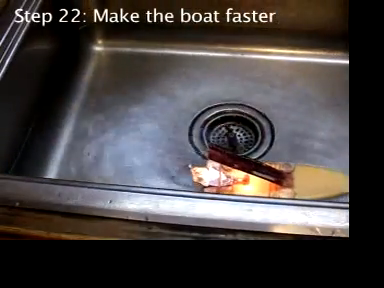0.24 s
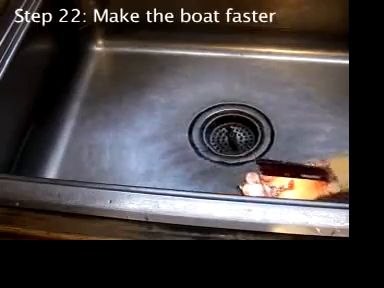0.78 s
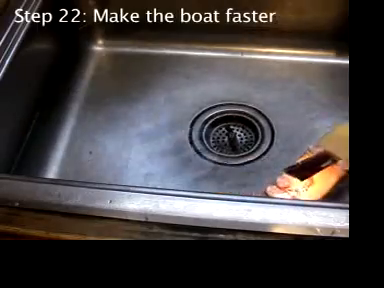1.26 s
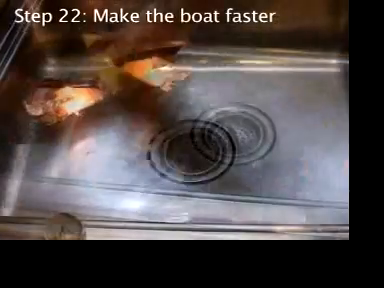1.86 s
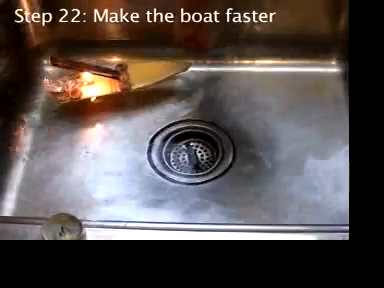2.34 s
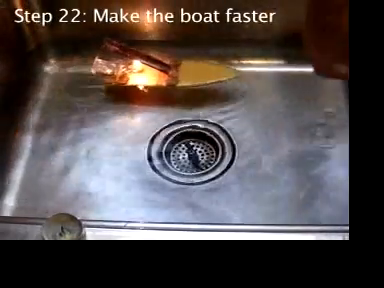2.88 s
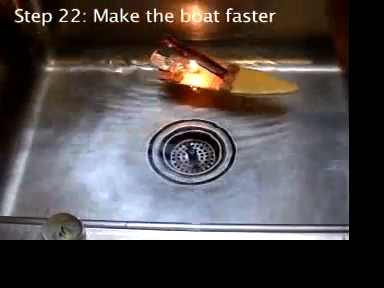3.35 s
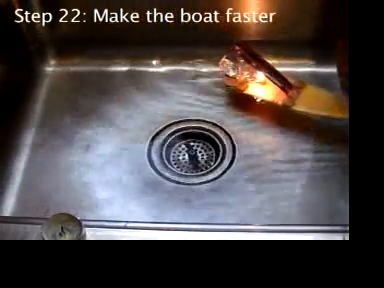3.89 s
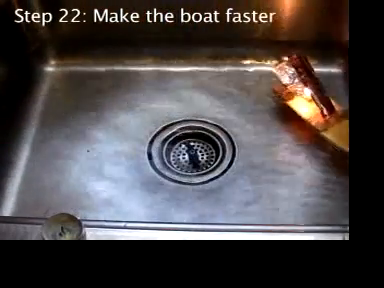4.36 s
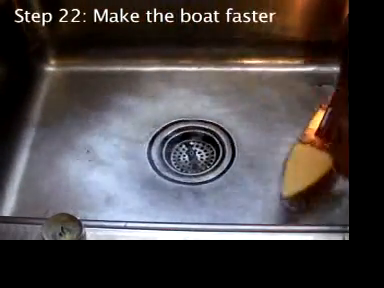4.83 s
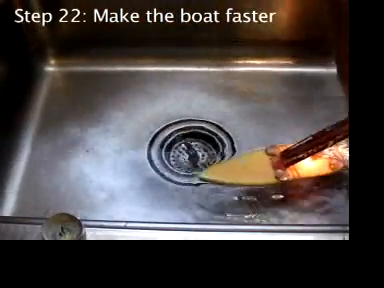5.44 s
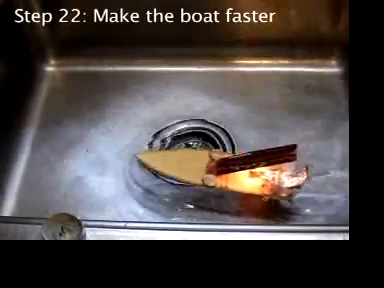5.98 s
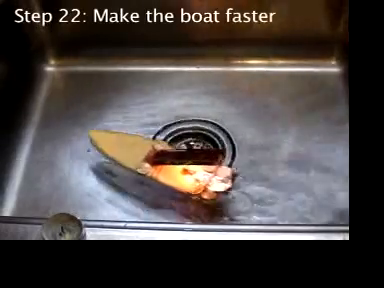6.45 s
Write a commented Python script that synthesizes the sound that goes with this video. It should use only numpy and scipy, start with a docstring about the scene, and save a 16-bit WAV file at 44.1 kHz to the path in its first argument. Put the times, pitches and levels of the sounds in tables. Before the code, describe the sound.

A small toy steam boat putt-putts fast in a steel sink, faltering twice at first, then popping along in steady metallic clicks.

```python
"""Close by a steel sink, a candle-heated toy boat sputters and stalls twice early on, leaving the room's hush.
Then it runs on. Most steam cycles buckle the thin boiler lid out and back in a tick, a loud pop, a return and a
settle; near 1.8 s the rhythm stumbles and two cycles pass without a pop, and one more near 4.0 s. Each snap
rings the lid's modes, cracks as dying noise, knocks the hull and is answered by the basin's decaying noise.
Room and microphone noise and faint steady tones lie beneath."""
import sys
import numpy as np
from scipy import signal
from scipy.fft import rfft, irfft, next_fast_len
from scipy.io import wavfile

SR = 44100
rng = np.random.default_rng(int(sys.argv[2]) if len(sys.argv) > 2 else 0)


def digitize_waveform(pressure):
    """Quantize a signal to 16-bit integers and store it at the path in sys.argv[1].

    Rows of a 2-D input are taken as channels; values are limited to [-1, 1].
    """
    field = np.atleast_2d(pressure).T
    bounded = np.clip(field, -1, 1)
    quanta = np.round(bounded * 32767).astype(np.int16)
    wavfile.write(sys.argv[1], SR, quanta)


N = 295911
LENGTH = 6400  # samples given to one snap and its echo

# steam cycles: (pop time [s], pop level before trims [dB], tick to pop [ms], pop to return [ms],
# return to settle [ms])
CYCLES = [(.0912, -4, 45.8, 34.3, 22.8), (.398, -4.5, 29.8, 40.8, 21), (.5063, -5.5, 25.7, 42.9, 20.8),
          (.622, -6, 29.8, 38.3, 21), (.7344, -7, 28.9, 39.7, 21), (1.059, -5.5, 32.3, 36, 22.4),
          (1.166, -4.5, 25.3, 42.2, 15.2), (1.274, -4, 21.4, 43, 8.2), (1.3777, -3, 17.9, 45.5, 14.3),
          (1.4825, -3.5, 15.4, 47.5, 13), (1.5917, -5, 15.9, 47.7, 10), (1.6934, -6.5, 13.5, 47.8, 11.5),
          (1.79, -35, 7.6, 22.8, 9.7), (1.883, -35, 20.3, 27.6, 27.2), (2.0033, -.5, 20.9, 30.8, 21.1),
          (2.1203, -1.5, 19.9, 33.8, 18), (2.2358, -2, 14.9, 36.6, 17.6), (2.3531, -2, 15.8, 36.9, 14.8),
          (2.4673, -1.5, 13.6, 38.9, 15.6), (2.583, -3.5, 11.8, 39.3, 14.4),
          (2.6973, -3.5, 11.5, 39.9, 15.4), (2.8143, -5, 13.3, 37.7, 17.9), (2.9343, -2, 16.8, 36.7, 18.3),
          (3.054, -2, 17.3, 37.1, 15.4), (3.1715, -1.5, 16.7, 37.1, 15.1), (3.2905, .5, 18.2, 35.8, 17.1),
          (3.4131, .5, 21.8, 32.2, 14.7), (3.5322, -1, 23.4, 30.4, 18.1), (3.6479, -1, 20.4, 35.1, 19),
          (3.7669, .5, 19.1, 36.5, 15.6), (3.8843, -.5, 18.9, 36.7, 17.9), (4.003, -35, 19.5, 31, 21.2),
          (4.132, .5, 31, 25.5, 17.9), (4.2539, -3, 33.1, 19.8, 21.9), (4.367, -1, 25.7, 32, 18.7),
          (4.4848, -2.5, 21.8, 35.3, 19.9), (4.6055, -2.5, 21.5, 37.3, 16.5),
          (4.7282, -5.5, 21.2, 36.7, 16.1), (4.8467, -5, 16.5, 37.9, 16.2), (4.9657, -3, 17.5, 36.3, 15.3),
          (5.0849, -3, 17.5, 35.2, 15.5), (5.2028, -2, 17.4, 37.2, 14), (5.3193, -2, 14.3, 38.1, 13.6),
          (5.435, -6, 12.8, 37.6, 14.6), (5.5498, -3.5, 13.1, 38.7, 14.5), (5.6677, -5, 13.7, 38, 14.6),
          (5.7842, -3.5, 13.4, 39.3, 13.9), (5.905, -4, 17, 37.7, 14.3), (6.0239, -1.5, 15.7, 38.2, 17.3),
          (6.1427, -3, 16.4, 38.5, 16.8), (6.2656, -1.5, 19.5, 36.9, 14.1), (6.3876, -1, 20.6, 33.8, 15.8),
          (6.507, -1.5, 23.5, 31.8, 14.3), (6.626, -3, 24.4, 30.7, 16)]
# lone snaps, and one short bright hiss at 0.361 s, while the engine falters:
# (time [s], high ring level before trims [dB], high ring [Hz], low ring [Hz], then before trims and
# relative to the high ring: low ring [dB], crack [dB], knock [dB]; knock [Hz])
SPUTTERS = [(.0004, -18.5, 1940, 1320, -1, -11, -16, 775), (0.012, -14, 3670, 1580, -1, -1, -1.5, 670),
            (.251, -21.5, 2380, 1310, 8.5, -19, -8, 579), (0.2689, -18, 2120, 960, 3, -11, -8, 805),
            (0.3485, -22, 2380, 1340, 8, -15, -3, 576), (0.361, -30, 3280, 1700, 3, 12.5, -2, 600),
            (0.9626, -47, 2240, 1500, 17, -6, 30.5, 635), (0.9685, -56, 2260, 1500, 9, -4, 25, 643),
            (1.004, -21.5, 2540, 1520, 6.5, -13, -1.5, 574)]
SNAP_COUNT = 4 * len(CYCLES) + len(SPUTTERS)


def engine():
    """Snaps and basin echoes placed in time; the treble reaches the two microphone ports by different paths."""
    delay_s, bass_hz = .0006, 160
    rows = rattled(snaps())
    wet = irfft(rfft(rows) * rfft(basin()), LENGTH)
    # the small basin scatters low tones less
    wet = coloured(wet, lambda hz: 0.48 + 0.22 / (1 + (900 / (hz + 1)) ** 4))

    paths = rng.standard_normal(rows.shape) * dying(0.0034, .0001)
    paths = rfft(paths / np.linalg.norm(paths, axis=-1, keepdims=True))
    apart = coloured(rows, lambda hz: paths * amp(-2.5) * (hz / 12000) ** 0.91)
    heard = rows + np.array([apart, -apart]) + amp(-3.5) * wet

    out = np.zeros((2, N + LENGTH))
    for k, row in enumerate(snap_rows()):
        start = round((row[0] + delay_s) * SR)
        out[:, start:start + LENGTH] += heard[:, k]
    wide = np.pad(out, ((0, 0), (0, next_fast_len(N + 2 * LENGTH) - N - LENGTH)))
    # a small boat radiates little bass
    return coloured(wide, lambda hz: (1j * hz / (bass_hz + 1j * hz)) ** 3)[:, :N]


def snaps():
    """The direct sound of every snap, one row each: lid rings, dense lid noise and a knock on the hull."""
    s, db, high_hz, low_hz, low_db, crack_db, knock_db, knock_hz = snap_rows().T
    # chance from snap to snap; the treble crack varies most
    level_scatter_db, crack_scatter_db, pitch_scatter = 1.2, 2.5, .02
    chance = rng.standard_normal((SNAP_COUNT, 6)).T
    db = db + level_scatter_db * chance[0]
    low_db = low_db + level_scatter_db * chance[1]
    crack_db = crack_db + crack_scatter_db * chance[2]
    knock_db = knock_db + level_scatter_db * chance[3]
    high_hz = high_hz * np.exp(pitch_scatter * chance[4])
    low_hz = low_hz * np.exp(pitch_scatter * chance[5])

    noise = lid_noise(db, low_db, crack_db)
    rings = lid_rings(s, db, high_hz, low_hz, low_db)
    push = amp(db + knock_db + 5.5)[:, None] * knock(knock_hz)
    return rings + noise + push


def snap_rows():
    """Tick, pop, return and settle of every cycle in turn, then the sputters; columns as for SPUTTERS."""
    # colour of each snap over time, changing abruptly near 1.8 s, all three with the columns of SPUTTERS:
    # (time [s], high ring level [dB], high ring [Hz], low ring [Hz], low ring [dB], crack [dB],
    # knock [dB], knock [Hz])
    tick_colours = [(.05, -19.5, 2190, 1260, 6, -10, -5, 790), (.4, -20, 2040, 910, 8.5, -8, -16, 800),
                    (1.1, -21.5, 2010, 960, 7.5, -8, -28, 800), (1.76, -15.5, 1990, 960, -6, -19, -29, 650),
                    (1.86, -8.5, 2650, 1130, -3.5, -3.5, -8.5, 540),
                    (2.6, -4, 2750, 990, -23, -11, -14, 530), (3.2, -10, 3000, 1090, 0.5, -1.5, -12, 536),
                    (3.75, -6, 2770, 970, -15, -14.5, -19.5, 535),
                    (4.1, -11.5, 2980, 1430, -3.5, -13, -12, 517),
                    (4.5, -10.5, 2950, 1200, -5, -3.5, -14, 866), (5.1, -9.5, 2880, 1090, 1, -3, -15, 874),
                    (5.6, -13, 2700, 950, -2.5, -1, -7, 597), (6.0, -10, 2880, 1010, -3, -3.5, -14, 650),
                    (6.7, -13, 2750, 1040, 1, -4.5, -14, 633)]
    return_colours = [(.13, -14, 3430, 1210, 10.5, 3.5, 0, 680), (.5, -15, 3100, 1170, 2, 0, -0.5, 670),
                      (1.1, -11.5, 3030, 1000, -2.5, -5, -7.5, 585),
                      (1.3, -14, 2820, 1600, -3, -2.5, -2, 664), (1.75, -14.5, 3300, 1540, 2, 2.5, -2, 530),
                      (1.85, -19, 2200, 1160, 12, -21, -3, 545),
                      (2.2, -10, 2470, 1260, -4.5, -1, -12.5, 550),
                      (2.6, -9.5, 2270, 1250, -4, -16.5, -6.5, 566),
                      (3.0, -13, 2510, 1240, 6, -0.5, -5, 720), (3.45, -17.5, 2630, 1105, 9.5, -3, -8, 576),
                      (3.9, -18, 2670, 1320, 3.5, -4, -6.5, 794), (4.55, -13.5, 2420, 1290, 6, -8, -9, 835),
                      (4.8, -9.5, 3400, 1210, 6, -5, -16, 485), (5.0, -10, 2500, 1160, 1.5, -7, -14.5, 645),
                      (5.4, -13, 2500, 1280, 6.5, -2, -11, 634),
                      (6.0, -11.5, 2700, 1250, 6.5, -6.5, -11.5, 650),
                      (6.7, -19, 2350, 1250, 12.5, -1, -8, 790)]
    settle_colours = [(.15, -20, 2970, 1320, -9, -4, -20, 800), (1.1, -32.5, 3130, 1540, 21, -8, -6, 650),
                      (1.3, -24, 1900, 1600, 10, 2.5, 4.5, 645),
                      (1.76, -19.5, 2330, 1440, 13.5, 1.5, 0.5, 640),
                      (1.82, -3, 2330, 1180, -2.5, -10, -13.5, 556),
                      (2.1, -10.5, 1760, 1150, -2, -2.5, -13, 540),
                      (2.6, -8.5, 3160, 1090, -7.5, -6.5, -16.5, 600),
                      (3.0, -12, 2870, 1210, 2.5, -6, -9, 550), (3.15, -19, 1815, 1210, 6, 2.5, -7.5, 542),
                      (3.9, -20, 1830, 1040, 3, -5, -7, 553), (4.3, -15, 1930, 1560, -1.5, -7.5, -11, 557),
                      (4.65, -16.5, 1760, 1620, -3, -3.5, -16, 545),
                      (4.8, -12.5, 3240, 1177, -4, -3, -11, 590),
                      (5.75, -17, 2840, 1350, 6.5, -1, -4.5, 610),
                      (5.9, -13.5, 2000, 1360, 4.5, -1.5, -11, 590),
                      (6.7, -16, 1850, 1150, -5, -6.5, -16, 605)]
    # the pop, whose level each cycle gives: (time [s], high ring [Hz], low ring [Hz], low ring [dB],
    # crack [dB], knock [dB], knock [Hz])
    pop_colours = [(.1, 2100, 890, -10, -8.5, -13.5, 677), (.55, 2790, 1500, -2.5, -4.5, -10, 570),
                   (.75, 2120, 1730, -4.5, -10, -5.5, 596), (1.05, 2030, 890, -8.5, -11, -5, 640),
                   (1.7, 2140, 970, -5.5, -4, -10, 637), (2.0, 2140, 1870, -14, -8, -15, 764),
                   (2.8, 2240, 1410, -12.5, -20.5, -12.5, 786), (3.2, 2330, 1510, -15, -7.5, -14.5, 583),
                   (3.55, 2330, 1400, -18, -7, -17.5, 566), (3.8, 2490, 1700, -16, -16, -17, 735),
                   (4.2, 2330, 1415, -9.5, -2.5, -20, 547), (4.5, 2280, 1650, -9, -14.5, -11, 727),
                   (5.2, 2310, 1580, -10.5, -13, -12, 646), (6.2, 2490, 1690, -7, -11, -13.5, 640),
                   (6.4, 2450, 1310, -11, -6.5, -16, 630)]
    misfire_db, misfire_loss_db = -30, 8.5  # a lid that did not pop springs back weakly

    s, db, lead_ms, back_ms, after_ms = np.transpose(CYCLES)
    tick = s - lead_ms / 1000
    back = s + back_ms / 1000
    settle = back + after_ms / 1000
    back_db, *back_colour = colour(return_colours, back)
    back_db = back_db - misfire_loss_db * (db < misfire_db)
    cycle = [[tick, *colour(tick_colours, tick)],
             [s, db, *colour(pop_colours, s)],
             [back, back_db, *back_colour],
             [settle, *colour(settle_colours, settle)]]
    in_turn = np.transpose(cycle, (2, 0, 1)).reshape(4 * len(s), -1)
    return np.vstack([in_turn, SPUTTERS])


def lid_rings(s, db, high_hz, low_hz, low_db):
    """Clear lid modes ring round a low and a high centre; an upper ring swells with the low one."""
    # upper ring relative to the low ring: (time [s], level before the return boost [dB])
    upper_levels = [(0, -21), (1.0, -20.5), (2.0, -16.5), (4.2, -24), (4.7, -15), (6.0, -15.5), (6.7, -24)]
    return_upper_db = 3.5  # the return stroke wakes the upper ring most
    first_gain = 0.23 * db  # stronger snaps have sharper first cycles (dB)
    k = np.arange(SNAP_COUNT)
    is_return = (k % 4 == 2) & (k < 4 * len(CYCLES))
    upper_db = low_db + colour(upper_levels, s)[0] + return_upper_db * is_return
    upper_hz = np.full(len(s), 3620.)

    low = ring(low_hz, spread=0.11, t60=0.049, attack=0.001, first_db=7.5 + first_gain)
    high = ring(high_hz, spread=0.047, t60=0.039, attack=0.00042, first_db=13.5 + first_gain)
    upper = ring(upper_hz, spread=0.05, t60=0.029, attack=0.0024, first_db=-27)
    low = amp(db + low_db - 0.5)[:, None] * low
    high = amp(db - 0.61)[:, None] * high
    return low + high + amp(db + upper_db)[:, None] * upper


def ring(centre_hz, spread, t60, attack, first_db):
    """The lid modes near each centre start almost together, then beat; first_db sets the extra first cycles."""
    # clear lid modes: frequency [Hz]
    lid_hz = [765, 963, 1022, 1043, 1177, 1116, 1307, 1446, 1368, 1607, 1618, 1574, 1905, 1840, 1984, 2033,
              2214, 2343, 2227, 2424, 2560, 2474, 2500, 2530, 2700, 2786, 2950, 3230, 3520, 3410, 3520,
              3250, 3534, 3707]
    t = np.arange(LENGTH) / SR
    scatter = amp(2.5 * drifting((len(lid_hz),), memory=.8))
    phase = 0.76 * rng.standard_normal((len(lid_hz), 1))
    modes = np.sin(2 * np.pi * np.outer(lid_hz, t) + phase)
    shape = dying(t60, attack) + amp(first_db)[..., None] * dying(0.0038, attack)
    return peak_one(nearness(lid_hz, centre_hz, spread) * scatter @ modes * shape)


def lid_noise(db, low_db, crack_db):
    """Lid modes too dense to tell apart sound as noise that dies: a body and a brighter crack."""
    # dense lid modes: (frequency [Hz], relative density level [dB per Hz])
    dense_lid = [(500, -51), (800, -14.5), (1000, 5.5), (2300, 7.5), (3100, 3.5), (4500, -3.5),
                 (6000, -9.5), (9000, -16.5), (11500, -28), (16000, -38)]
    noise = drifting((2, LENGTH), memory=0.952)
    soft = 0.00019 * amp(-.7 * db)[:, None]  # a weak snap rolls across the lid and starts slower (s)
    body = coloured(noise[:, 0], lambda hz: amp(along(dense_lid, hz)) * (hz < 4500)) * dying(0.083, soft)
    treble = coloured(noise[:, 1], lambda hz: amp(along(dense_lid, hz)) / (1 + (3800 / (hz + 1)) ** 6))
    crack = treble * (dying(0.0065, 0.00048) + amp(-9) * dying(0.043, soft))
    body_gain = amp(db + np.minimum(low_db, 0) - 0.5)[:, None]
    return body_gain * peak_one(body) + amp(db + crack_db + 2.5)[:, None] * peak_one(crack)


def knock(centre_hz):
    """One short push into the hull: most modes always answer, those nearest the push ring more."""
    # hull and basin floor modes: (frequency [Hz], width [Hz], relative level [dB],
    # share that answers wherever the push lands [0-1])
    hull_modes = [(167, 20, -8, 0.9), (226, 9.4, 4, 1), (319.4, 40, 4, 0.96), (431, 67, 5.5, 0.82),
                  (547.6, 47, 6.5, 0.89), (647, 72, 8.5, 0.04), (800, 125, 7.5, 1)]
    lag_s = 0.00064  # the push takes a moment to reach the hull
    f = np.fft.rfftfreq(LENGTH, 1 / SR)
    centre, width, level_db, always = np.transpose(hull_modes)[..., None]
    modes = amp(level_db) * 1j * f * width / (centre ** 2 - f ** 2 + 1j * f * width)
    share = always[:, 0] + 1.51 * nearness(centre[:, 0], centre_hz, spread=0.08)
    push = dying(0.0034, 0.00063)
    return peak_one(coloured(push, lambda hz: share @ modes * np.exp(-2j * np.pi * hz * lag_s)))


def rattled(rows):
    """The lid buckles in steps: small creases repeat each snap, relatively stronger the weaker it is."""
    span_s, crease_db, grows = .016, -12.5, 0.35  # time span; level at 0 dB; dB gained per dB of weakness
    crease_hz = 1500  # creases are too small to repeat the low tones
    db = snap_rows()[:, 1]
    late = span_s * (.5 + .5 * np.tanh(drifting((5,), memory=.9)))
    gain = amp(np.minimum(crease_db - grows * db, 0))[:, None] * drifting((5,), memory=0.803)

    def steps(hz):
        repeats = sum(g[:, None] * np.exp(-2j * np.pi * hz * t[:, None]) for g, t in zip(gain.T, late.T))
        return 1 + hz / (hz - 1j * crease_hz) * repeats

    return coloured(rows, steps) / np.sqrt(1 + np.sum(gain ** 2, axis=1, keepdims=True))


def basin():
    """The steel walls answer each snap with noise, each frequency dying at its own speed."""
    # basin decay: (frequency [Hz], time to fall 60 dB [s])
    decay_times = [(200, 0.39), (1000, 0.16), (3000, 0.21), (8000, 0.22), (15000, 0.12)]
    # stereo image of the basin: (frequency [Hz], left-right likeness [-1 to 1])
    likeness = [(100, 0.48), (400, 0.86), (1500, 0.96), (4000, 0.94), (9000, 0.39), (15000, 0.042)]
    hz, t, z = signal.stft(drifting((2, LENGTH), memory=0.926), SR, nperseg=256)
    z = z * amp(-60 * t / along(decay_times, hz)[:, None])
    tail = signal.istft(z, SR, nperseg=256)[1][..., :LENGTH]
    tail = tail * (1 - amp(-np.arange(LENGTH) / SR / 0.000053))  # the answer builds up within about 1 ms
    tail /= np.linalg.norm(tail, axis=-1, keepdims=True)
    return paired(tail[:, 0], tail[:, 1], likeness)


def hush():
    """Steady room and microphone noise, shaped from white noise, with the recorder's faint sine tones."""
    # noise spectrum: (frequency [Hz], relative density level [dB per Hz])
    spectrum = [(15, -40), (30, -14), (80, -6.5), (430, -4), (600, -6), (960, -8), (1500, -14), (3000, -21),
                (5500, -28.5), (10500, -23), (13000, -38), (16000, -32)]
    # faint steady tones of the recorder: (frequency [Hz], RMS level before the stereo balance [dB])
    whine = [(8000, -69), (11348, -88)]
    noise_db = -46  # RMS, before the stereo balance
    likeness = [(60, 0.068), (300, 0.3), (3000, 0.66), (9000, 0.084)]  # (frequency [Hz], left-right likeness)
    white = rng.standard_normal((2, next_fast_len(N)))
    a, b = coloured(white, lambda hz: amp(along(spectrum, hz)))
    pair = paired(a, b, likeness)[:, :N]
    t = np.arange(N) / SR
    tones = sum(amp(db + 3) * np.sin(2 * np.pi * hz * t) for hz, db in whine)  # +3 dB: RMS to peak
    return amp(noise_db) * pair / np.sqrt(np.mean(pair ** 2)) + tones


def amp(db):
    """Decibels to amplitude."""
    return 10 ** (np.asarray(db) / 20)


def along(points, hz):
    """(Hz, value) points read on a log frequency axis."""
    f, v = np.transpose(points)
    return np.interp(np.log(hz + 1), np.log(f + 1), v)


def colour(table, s):
    """The columns after the time, read at times s."""
    when, *cols = np.transpose(table)
    return [np.interp(s, when, c) for c in cols]


def peak_one(x):
    """Each row scaled to peak 1."""
    return x / np.abs(x).max(-1, keepdims=True)


def coloured(x, gain):
    """Rows of x through a gain given on their FFT grid."""
    return irfft(rfft(x) * gain(np.fft.rfftfreq(x.shape[-1], 1 / SR)), x.shape[-1])


def paired(a, b, alike):
    """Left and right from two unrelated sounds, alike by frequency."""
    turn = lambda hz: np.arccos(along(alike, hz)) / 2
    mid = coloured(a, lambda hz: np.cos(turn(hz)))
    side = coloured(b, lambda hz: np.sin(turn(hz)))
    return np.array([mid + side, mid - side])


def dying(t60, attack):
    """Fast rise, exponential fall; both times in seconds."""
    t = np.arange(LENGTH) / SR
    return amp(-60 * t / t60) * (1 - np.exp(-t / attack))


def drifting(shape, memory):
    """Chance for every snap, keeping a share of the snap four before: the like one of the last cycle."""
    fresh = rng.standard_normal((SNAP_COUNT, *shape))
    fresh[4:] *= np.sqrt(1 - memory ** 2)  # keeps the spread steady
    return signal.lfilter([1], [1, 0, 0, 0, -memory], fresh, axis=0)


def nearness(hz, centre_hz, spread):
    """Gain of each mode by its log-frequency distance from where a snap puts its energy."""
    return amp(-6 * (np.log(np.array(hz) / centre_hz[:, None]) / spread) ** 2)


def scene():
    """Boat and hush together, the right side 0.9 dB above the left."""
    return (engine() + hush()) * amp([[-.45], [.45]])


def record(dry):
    """Soft overload near full scale, nothing above the band limit."""
    top_hz = 15800
    clipped = dry / (1 + np.abs(dry / 1.05) ** 8) ** (1 / 8)
    wide = np.pad(clipped, ((0, 0), (0, next_fast_len(N + SR // 4) - N)))
    return coloured(wide, lambda hz: hz < top_hz)[:, :N]


dry = scene()
out = record(dry)
digitize_waveform(out)
```